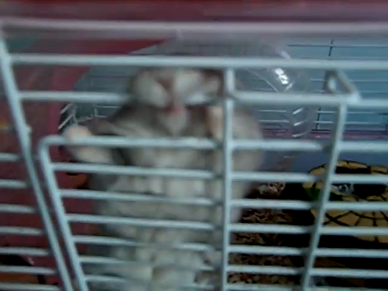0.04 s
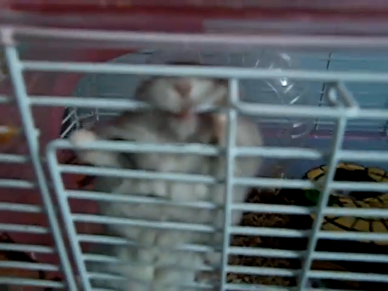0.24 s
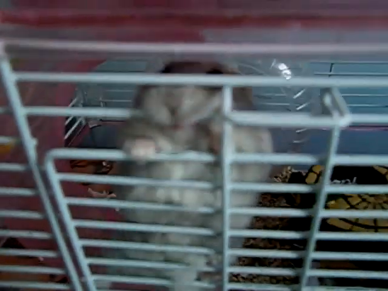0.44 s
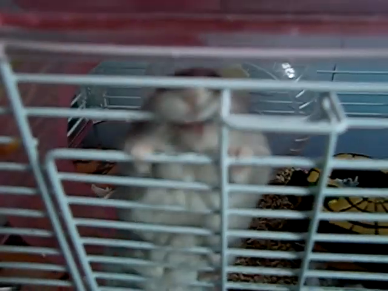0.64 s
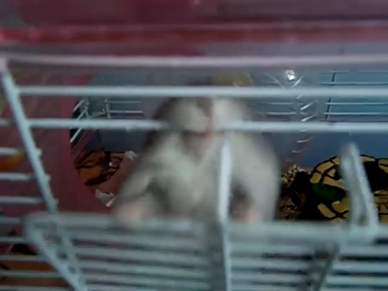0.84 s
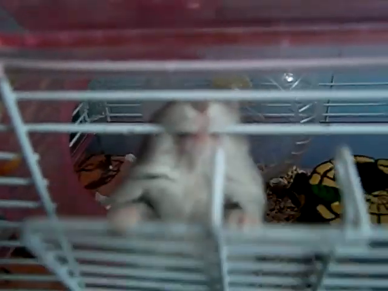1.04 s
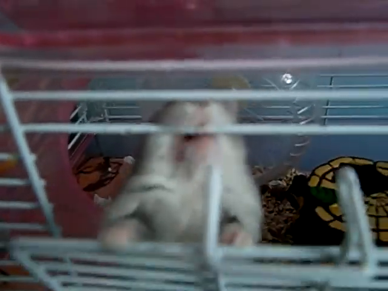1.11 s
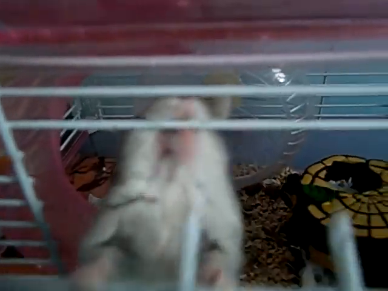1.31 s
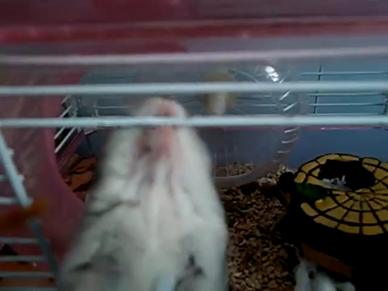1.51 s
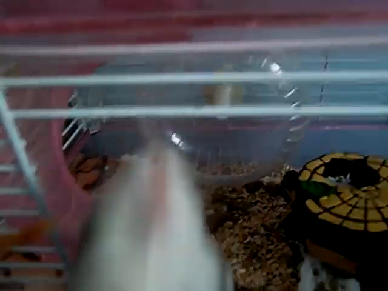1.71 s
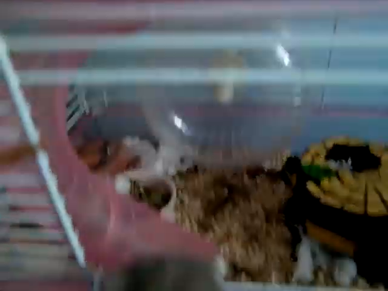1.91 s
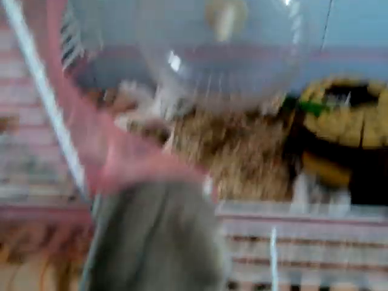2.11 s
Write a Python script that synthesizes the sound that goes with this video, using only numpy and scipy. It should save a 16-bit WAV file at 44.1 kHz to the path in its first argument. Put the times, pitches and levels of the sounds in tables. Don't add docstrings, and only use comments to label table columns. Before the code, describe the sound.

Thin metal cage wires click and rattle under a hamster's teeth and paws, then a sharp latch clank rings briefly; weaker taps follow and a final burst of plastic knocks, close microphone, small quiet room.

```python
import sys
import numpy as np
from scipy import signal
from scipy.fft import rfft, irfft
from scipy.io import wavfile
from scipy.ndimage import uniform_filter1d

SR = 44100
rng = np.random.default_rng(int(sys.argv[2]) if len(sys.argv) > 2 else 0)


def to_linear_factor(level_db):
    exponent = np.asarray(level_db, float) / 20
    return 10 ** exponent


def master_out(mix):
    frames = np.transpose(np.atleast_2d(mix))
    ceiling = np.clip(frames, -1, 1)
    pcm = np.round(ceiling * 32767).astype(np.int16)
    wavfile.write(sys.argv[1], SR, pcm)


N = 94815

# [f/Hz, density/dB per Hz]
AIR_SPECTRUM = [(22, 0), (42, -4), (62, 3.5), (80, -2.5), (110, 1.5), (230, -3), (350, -11.5), (849, -14),
                (16000, -35.5)]
# [t/s, level/dB, tilt/dB per octave, softness/dB per octave, chatter/s]
BITES = [(0.0, -30, 0.5, 8, 0.0024), (.063, -33, 1.5, 8, .0045), (.099, -32.5, 2.5, 18.5, 0.0028),
         (.136, -40, 1.5, 16, 0.009), (.196, -35.5, 0.5, 3.5, 0.0014), (.211, -29, 1, 9.5, 0.003),
         (.293, -27.5, 4, 10, 0.0079), (.371, -23.5, 1, 2.5, 0.0035), (.583, -26.5, 3.5, 13, 0.0035),
         (.726, -38.5, -6, -2, 0.0082), (.745, -39.5, -2, 18, 0.017), (.784, -17.5, 0.5, -8, 0.0067),
         (.817, -26.5, 0, 5.5, 0.015), (.833, -13.5, 0, 4.5, 0.0034), (.851, -26, 6, 39, 0.005),
         (.865, -43, 10, -2, 0.0048), (.894, -41, -5.5, -3, 0.012), (1.013, -41, -4, 26, 0.0024),
         (1.167, -41.5, -4.5, 25, 0.0026), (1.277, -49.5, -6, 15, 0.0022), (1.443, -60, -8, 11, 0.0053),
         (1.458, -51.5, -0.5, 3, 0.0081), (1.751, -32, 0, 31, 0.0042), (1.785, -54, -1, 0, 0.021),
         (1.812, -46.5, -1, 3, 0.02)]
# [f/Hz, level/dB, T60/s]
HELD_WIRES = [(1370, 5.5, 0.075), (1710, 8, 0.12), (2084, -2.5, 0.047), (2810, 4, 0.07), (3540, 9, 0.033),
              (3704, 2, 0.09), (4520, 5.5, 0.053), (5480, -9, 0.27), (6220, -3.5, 0.14), (6750, 9.5, 0.031),
              (8320, 0, 0.091), (9600, 2, 0.057), (10080, 0.5, 0.15), (12060, 6, 0.032)]
# [f/Hz, density/dB per Hz]
MESH = [(150, -15.5), (400, -11.5), (750, -1.5), (1080, -4.5), (1700, -6.5), (3500, -5.5), (7000, -9),
        (16000, -9)]
# [t/s, level/dB, tilt/dB per octave]
RELEASES = [(.003, -39.5, -4.5), (0.099, -42, -2), (0.299, -41, -2.5), (0.377, -38.5, -3),
            (.588, -40.5, -1.5), (.788, -25, -1), (.836, -30, -5.5), (.858, -26, 2), (0.891, -46, 10.5),
            (1.171, -51, -9.5), (1.491, -74, -3), (1.77, -57, -8), (1.846, -46, 2), (1.901, -42, -10.5)]
# [f/Hz, level/dB, T60/s]
FREE_WIRES = [(411, -26.5, 0.76), (480.4, -21.5, 0.37), (869, -20, 0.53), (1017, -18, 0.63),
              (1157, -19.5, 1.6), (1895, -9, 0.54), (2030, -17.5, 1.2), (2300, -17.5, 0.33),
              (2900, -14, 0.62), (2994, -15, 0.6), (3200, -22.5, 1.2), (3709, -28, 0.53), (5460, -16, 0.18),
              (6320, -30.5, 0.4)]
# [t/s, level/dB, tilt/dB per octave, softness/dB per octave, chatter/s]
KNOCKS = [(.150, -41, -1.5, 2, 0.0014), (.229, -35.5, 3.5, 28, 0.0026), (.516, -36.5, 3.5, 12.5, 0.0018),
          (.526, -37.5, 0, 6, 0.02), (.574, -35, -0.5, 6, 0.0077), (.835, -17.5, 2, -6, 0.0018),
          (.857, -48, 2, 13, 0.0035), (1.018, -41, -2, 25, 0.0042), (1.171, -44.5, 0.7, 11, 0.0033),
          (1.352, -48, -1, 15, 0.00074), (1.443, -46, -1, 4, 0.0044), (1.488, -40.5, 1, 7, 0.0013),
          (1.835, -27.5, -3, -1, 0.001), (1.840, -15.5, 3.5, 9, 0.002), (1.852, -20, 1.5, 11, 0.0025),
          (1.865, -27, 2, 8, 0.001), (1.876, -33, -0.5, 2, 0.0048), (1.898, -33.5, -7.5, -5, 0.0074)]
# [f/Hz, level/dB, T60/s]
TUB_WALLS = [(301, -9, 0.16), (459, -7.5, 0.11), (560, -0.5, 0.023), (720, 3, 0.077), (900, -14.5, 0.02),
             (1280, -2.5, 0.065), (1698, -4.5, 0.02), (2864, -13.5, 0.1), (3470, -8, 0.052)]
# [f/Hz, density/dB per Hz]
SHELL = [(150, -8), (300, -17.5), (650, -1), (1050, -4.5), (1600, -5.5), (3000, -12.5), (6000, -21.5),
         (16000, -14.5)]
# [t/s, level/dB, f/Hz, width/octaves, T60/s]
TICKS = [(.161, -34.5, 1820, 1, 0.0062), (.161, -46, 8800, 1.5, 0.0076), (0.174, -47, 4670, 0.3, 0.017),
         (0.226, -25, 2300, 1.13, 0.02), (0.228, -35, 11100, 0.42, 0.0067), (.537, -30, 1510, 0.86, .012),
         (0.538, -35, 3200, 0.83, 0.0071), (1.09, -57, 15500, 0.091, 0.05), (1.09, -56.5, 7000, 2.2, 0.089),
         (1.487, -37.5, 6060, 0.74, 0.013), (1.487, -38, 11100, 0.27, 0.01),
         (1.4877, -31.5, 576, 0.095, 0.016), (1.638, -40.5, 4480, 0.53, 0.0055),
         (1.638, -41.5, 1500, .7, 0.01), (1.688, -47, 6900, 0.87, 0.022), (1.689, -49.5, 2900, .6, 0.031),
         (1.840, -25.5, 8100, 0.65, 0.032), (1.934, -30.5, 9600, 1.4, 0.01),
         (1.934, -26, 2900, 0.69, 0.017), (1.934, -29.5, 1480, 0.32, 0.022), (2.06, -51, 3000, 1, 0.025),
         (1.751, -33.5, 3230, 0.15, 0.11), (.516, -33, 686, 0.1, 0.066), (1.49, -35, 1500, 0.74, 0.013),
         (1.841, -17, 645, 0.36, 0.02), (1.842, -24, 3550, .2, 0.058), (0.8331, -21.5, 2730, 1, 0.011),
         (.837, -18, 560, 0.33, 0.058), (.785, -20, 7100, 0.27, 0.034), (0.856, -33, 290, 0.14, 0.13),
         (1.351, -42.5, 840, 0.27, 0.046), (1.441, -52.5, 3550, 0.17, 0.062), (1.015, -39, 815, 0.15, .05),
         (1.015, -46, 3470, 0.12, .04), (.585, -27.5, 900, 0.17, 0.019), (1.168, -43.5, 3480, 0.084, .04),
         (1.169, -37, 835, 0.23, 0.035), (1.443, -42.5, 860, 0.33, .04), (0.836, -15, 1560, 0.21, 0.033),
         (1.751, -33, 1780, 0.12, 0.087)]
# [t/s, level/dB, tilt/dB per octave]
SPRINGS = [
    (0.787, -26.5, -2),
    (0.819, -35, 3),
    (0.855, -23, -6.5),
    (.864, -28, 4),
    (0.892, -40, 7.5),
    (1.499, -62, 5),
]
# [f/Hz, level/dB, T60/s]
LATCH_HOOK = [(1231, -1, 0.13), (1820, -7, 0.15), (2858, 6.5, 0.15), (10400, -33, 0.3)]
NEIGHBOURS = [-1.8, -1, 0, 1, 1.8]
NEIGHBOUR_DB = [-9, -5, 0, -5, -9]

LOW_HZ, SPAN_HZ = 150, 15800
SOFT_HZ = 4410
SCATTER_DB = 2.5
SECOND = np.arange(SR) / SR
FIFTH = SECOND[:SR // 5]


def unit(x):
    return x / np.sqrt(np.mean(x ** 2))


def colour(spectrum, hz):
    table_hz, table_db = np.array(spectrum).T
    return np.interp(np.log(hz), np.log(table_hz), table_db)


def air():
    hz = np.maximum(np.fft.rfftfreq(N, 1 / SR), 10)
    tones = rfft(rng.standard_normal(N)) * to_linear_factor(colour(AIR_SPECTRUM, hz))
    return unit(irfft(tones, N)) * to_linear_factor(-48)


def add(out, s, x):
    i = max(int(s * SR), 0)
    out[i:i + len(x)] += x[:N - i]


def peak(x):
    return x / np.sqrt(uniform_filter1d(x ** 2, size=200).max())


def spread(count):
    def place(u):
        return LOW_HZ + SPAN_HZ * u ** 1.5

    u = np.arange(count) / count
    hz = place(u + rng.random(count) / count)
    spacing_hz = place(u + 1 / count) - place(u)
    return hz, 10 * np.log10(spacing_hz / 100)


def group(modes):
    m = np.repeat(modes, 5, axis=0)
    detune = 0.014 * np.tile(NEIGHBOURS, len(modes))
    m[:, 0] *= 1 + detune * (0.5 + rng.random(len(m)) / 2)
    m[:, 1] += np.tile(NEIGHBOUR_DB, len(modes))
    return m


def rings(hz, t60, rise_cycles, t):
    hz = np.float32(hz[:, None])
    t60 = np.float32(np.clip(t60, 0.004, 1.3)[:, None])
    t = np.float32(t)
    turns = hz * t
    rise = 1 - np.exp(-turns / max(rise_cycles, 0.05))
    decay = np.exp(-np.float32(np.log(1000)) * t / t60)
    to_zero = 1 - t / t[-1]
    return rise * decay * to_zero * np.sin(np.float32(2 * np.pi) * (turns % 1))


def body(modes, crowd, crowd_db, t60_1khz, slope, rise_cycles):
    named_hz, named_db, named_t60 = group(modes).T
    crowd_hz, weight_db = spread(count=520)
    hz = np.r_[named_hz, crowd_hz]
    db = np.r_[named_db, weight_db + colour(crowd, crowd_hz) + crowd_db]
    t60 = np.r_[named_t60, t60_1khz * (crowd_hz / 1000) ** -slope]
    return hz, db, rings(hz, t60, rise_cycles, FIFTH)


def chatter_force(chatter):
    t = SECOND[:4096]
    pick, size = rng.random(len(t)), rng.standard_normal(len(t))
    rarity = np.clip(2000 / SR / pick, 0, 1) ** 4
    push = rarity * size * np.exp(-t / max(chatter, 2e-4))
    push[0] = 1
    tones = rfft(push)
    smooth_power = uniform_filter1d(abs(tones) ** 2, size=25)
    return irfft(tones / np.sqrt(smooth_power))[:2048]


def contacts(rows, hz, db, ring):
    out = np.zeros(N)
    for s, level_db, tilt_db, soft_db, chatter in rows:
        patch_db = 1.5 * np.interp(np.log2(hz / 150), np.arange(15) / 2, rng.standard_normal(15))
        shape_db = tilt_db * np.log2(hz / 2000)
        shape_db = shape_db - max(soft_db, 0) * np.log2(1 + (hz / SOFT_HZ) ** 4) / 4
        gain = to_linear_factor(db + shape_db + SCATTER_DB * rng.standard_normal(len(hz)) + patch_db)
        hit = np.float32(gain * rng.choice([-1, 1], len(hz))) @ ring
        add(out, s, to_linear_factor(level_db) * peak(signal.fftconvolve(hit, chatter_force(chatter))))
    return out


def bites():
    return contacts(BITES, *body(HELD_WIRES, MESH, crowd_db=4, t60_1khz=0.17, slope=0.35, rise_cycles=1.7))


def twangs(modes, rows):
    out, (hz, db, t60) = np.zeros(N), group(modes).T
    wires = rings(hz, t60, 20, SECOND)
    for s, level_db, tilt_db in rows:
        shape_db = db + tilt_db * np.log2(hz / 2000)
        gain = to_linear_factor(level_db + shape_db + SCATTER_DB * rng.standard_normal(len(hz)))
        add(out, s, np.float32(gain * rng.choice([-1, 1], len(hz))) @ wires)
    return out


def free_wires():
    return twangs(FREE_WIRES, RELEASES)


def knocks():
    return contacts(KNOCKS, *body(TUB_WALLS, SHELL, crowd_db=-6.5, t60_1khz=0.16, slope=0.32, rise_cycles=0.47))


def ticks():
    out, (hz, db) = np.zeros(N), spread(count=120)
    for s, level_db, centre_hz, width, t60 in TICKS:
        octaves = np.log2(hz / centre_hz)
        gain = to_linear_factor(db - 6.3 * (octaves / width) ** 2)
        gain = gain * (1 + 1.1 * rng.standard_normal(len(hz)))
        ring = rings(hz, t60 * (hz / centre_hz) ** -0.3, 0.49, SECOND[:SR // 20])
        add(out, s, to_linear_factor(level_db) * peak(gain @ ring))
    return out


def latch_hook():
    return twangs(LATCH_HOOK, SPRINGS)


def room(x):
    t60_s, dull_hz, level_db = 0.26, 4130, -18.5
    tail = rng.standard_normal(len(SECOND)) * np.exp(-np.log(1000) * SECOND / t60_s)
    tail = tail * (SECOND > 0.004)
    tail = signal.lfilter(*signal.butter(1, dull_hz, fs=SR), tail)
    return signal.fftconvolve(x, tail / np.sqrt(np.sum(tail ** 2)))[:N] * to_linear_factor(level_db)


def scene():
    near = bites() + free_wires() + knocks() + ticks() + latch_hook()
    return (near + room(near) + air())[None]


def band_limit(x):
    return signal.sosfilt(signal.butter(12, 16650, fs=SR, output="sos"), x)


def record(dry):
    rounded = np.tanh(1.1 * dry) / 1.1
    top_cut = signal.ellip(8, 0.2, 60, 15800, fs=SR, output="sos")
    return band_limit(signal.sosfilt(top_cut, rounded))


dry = scene()
out = record(dry)
master_out(out)
```